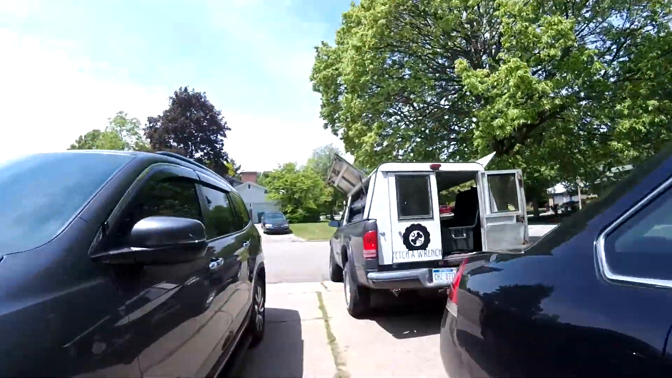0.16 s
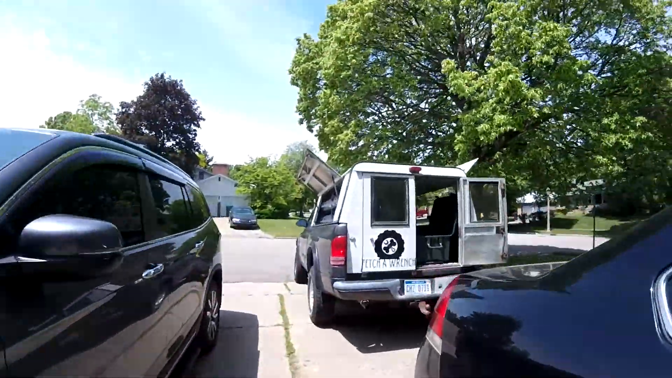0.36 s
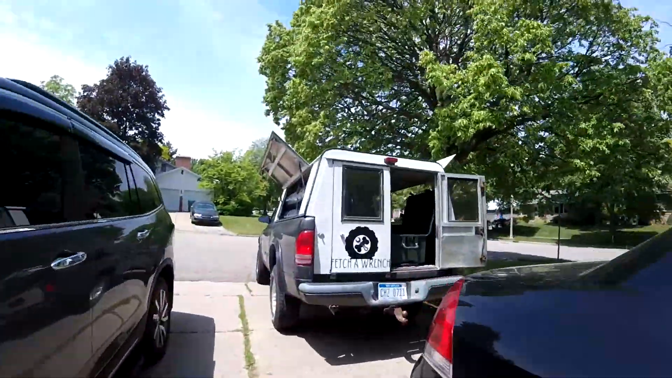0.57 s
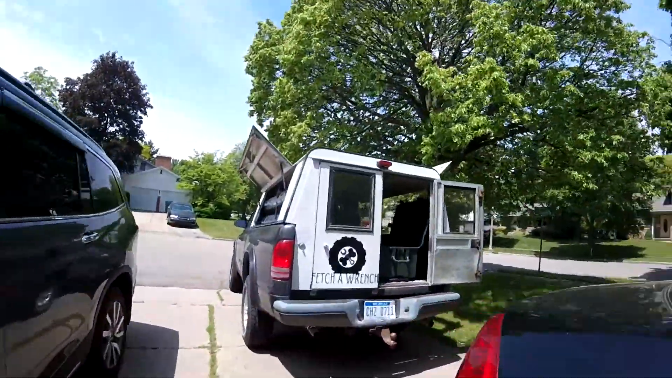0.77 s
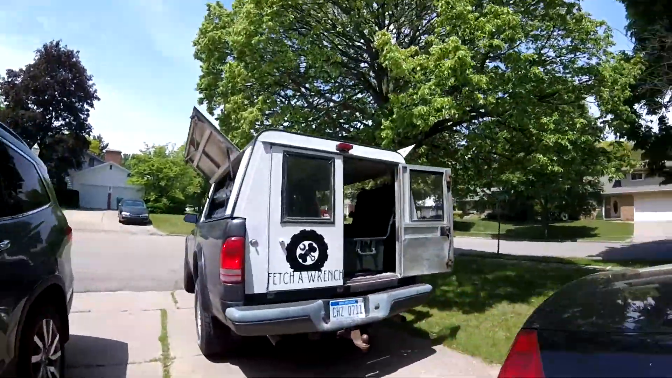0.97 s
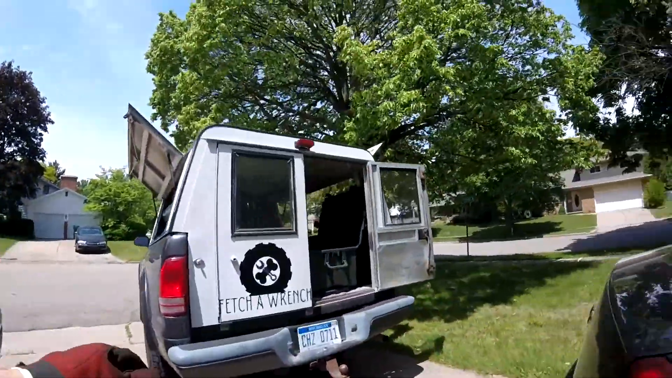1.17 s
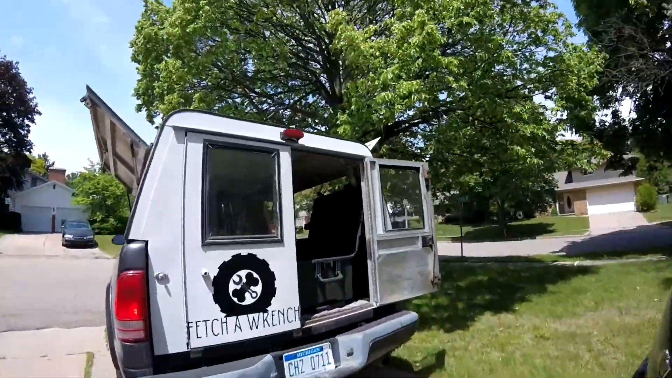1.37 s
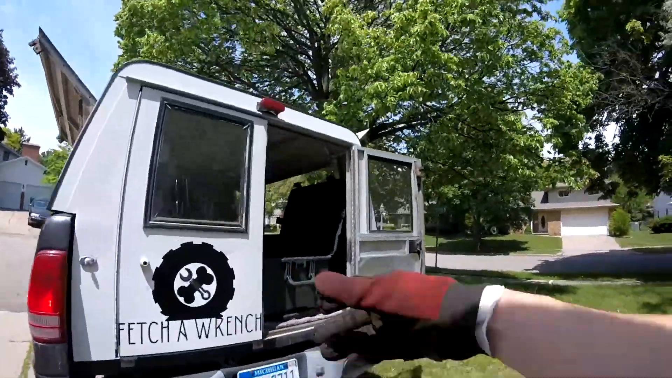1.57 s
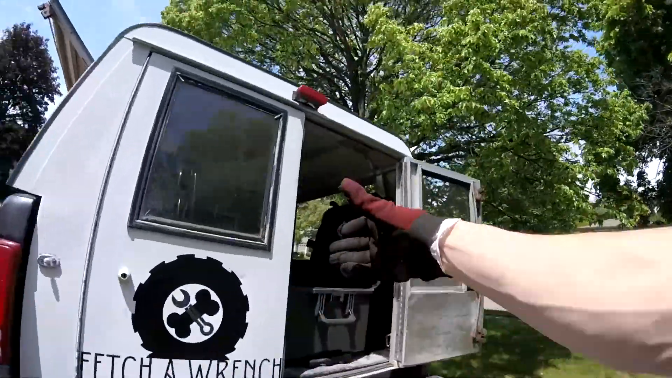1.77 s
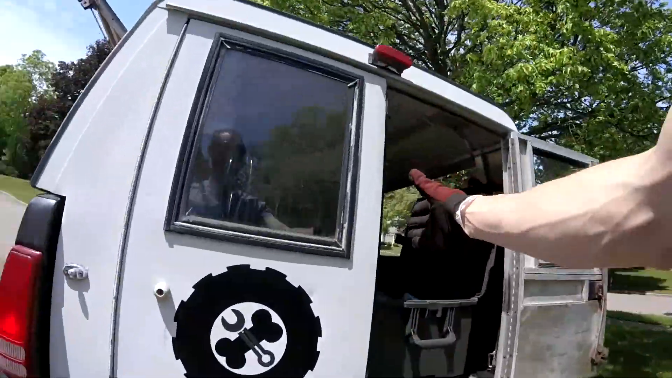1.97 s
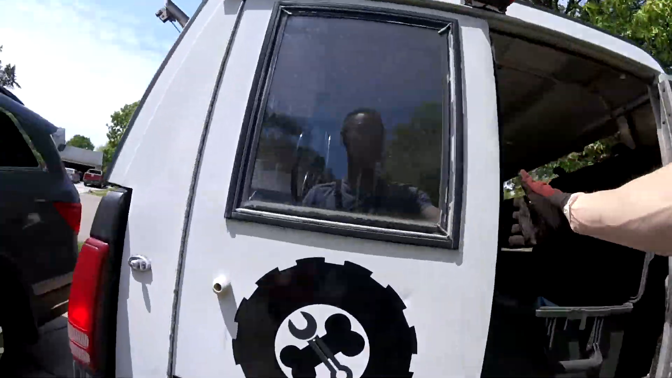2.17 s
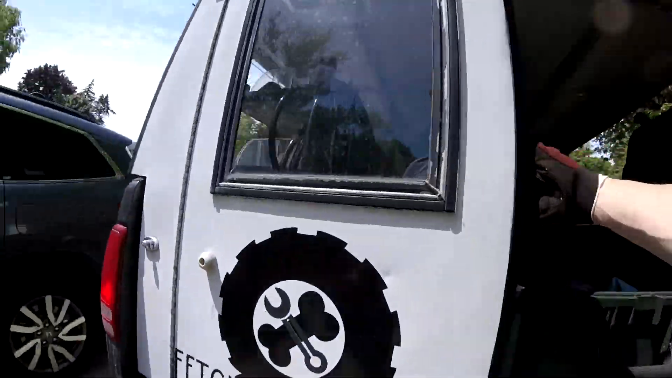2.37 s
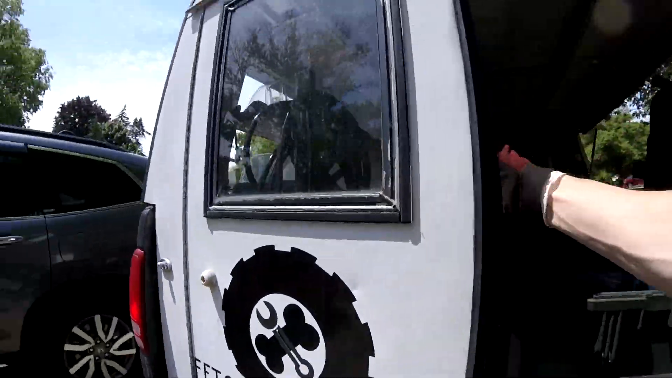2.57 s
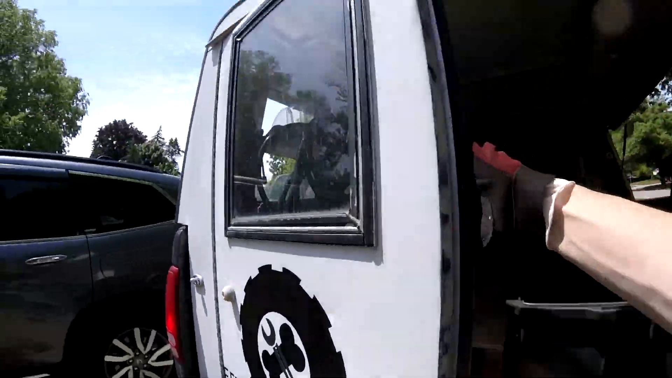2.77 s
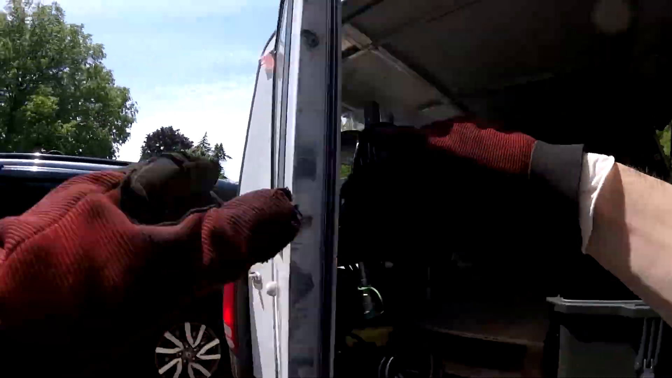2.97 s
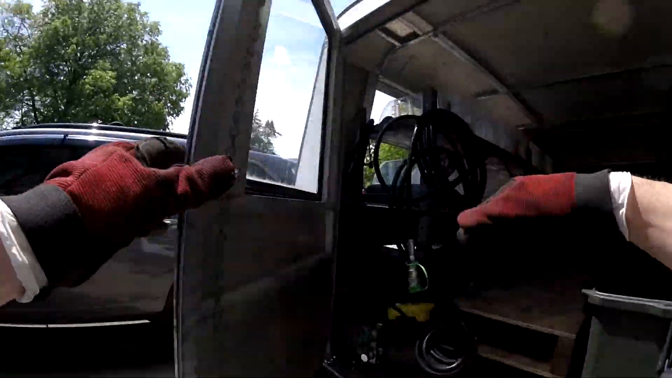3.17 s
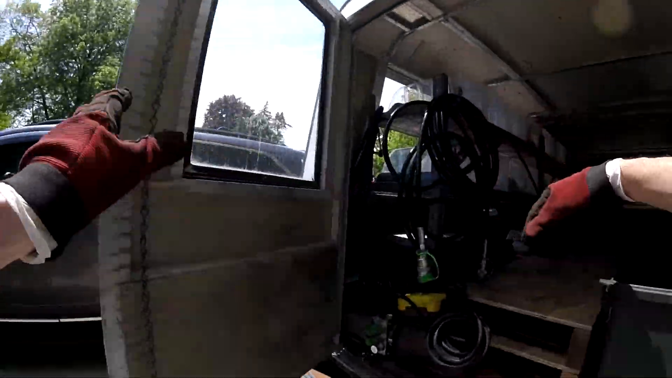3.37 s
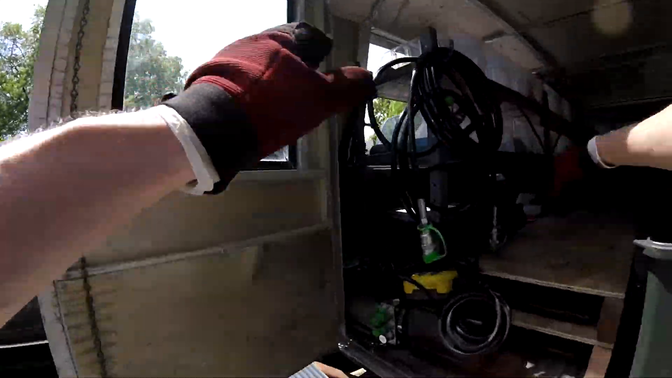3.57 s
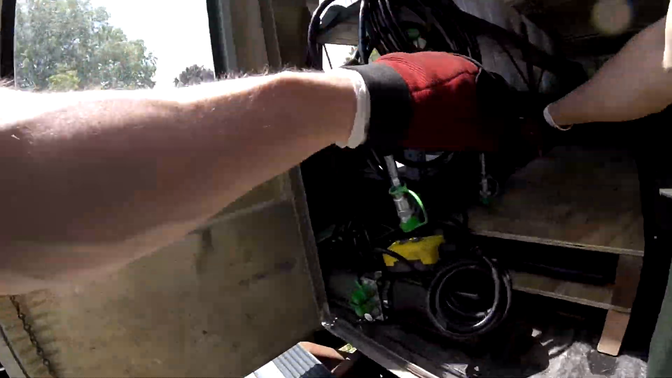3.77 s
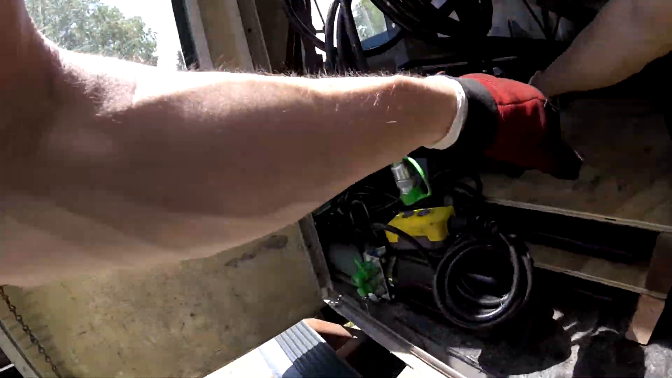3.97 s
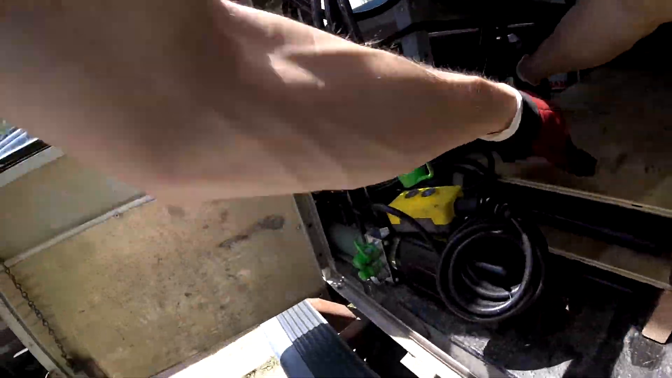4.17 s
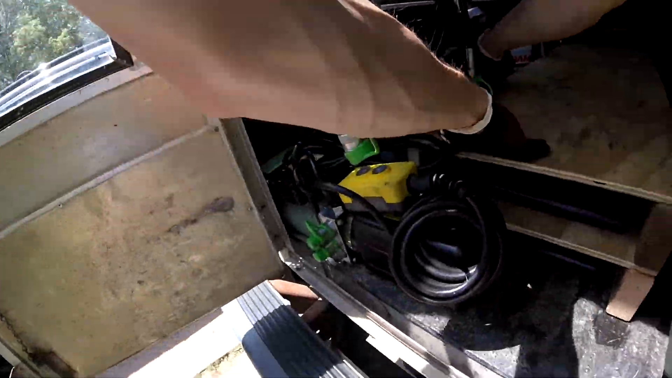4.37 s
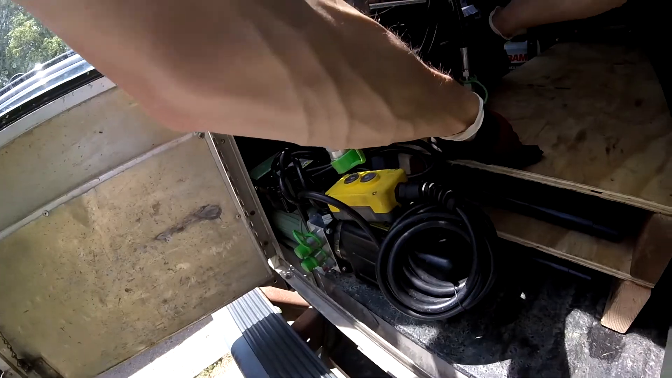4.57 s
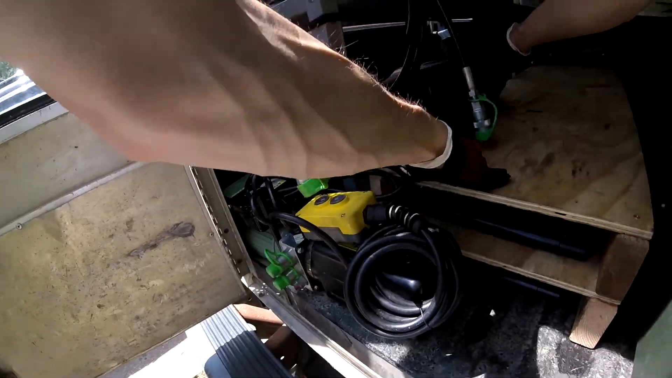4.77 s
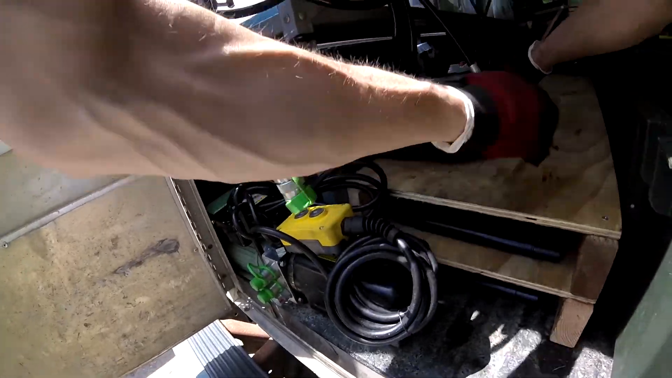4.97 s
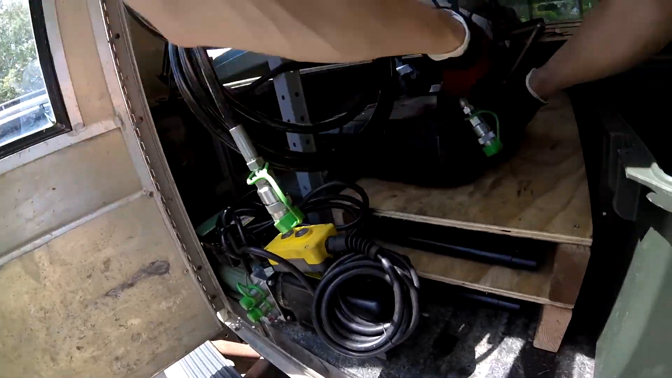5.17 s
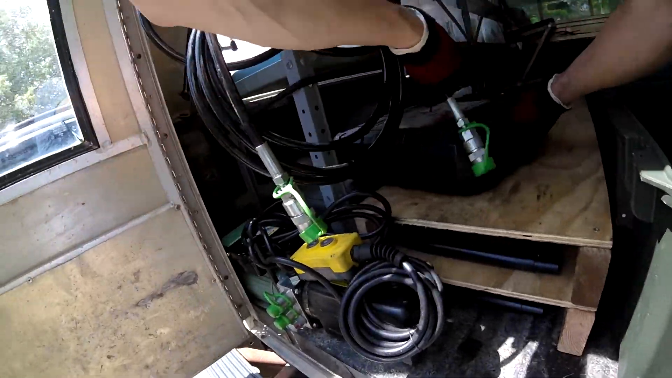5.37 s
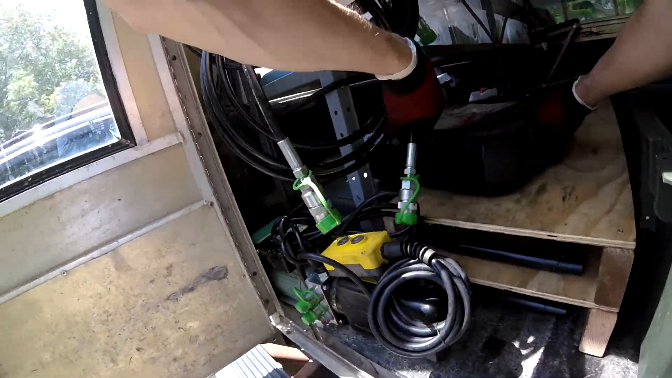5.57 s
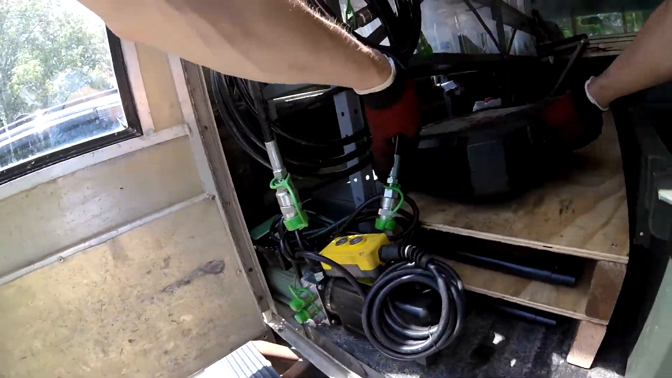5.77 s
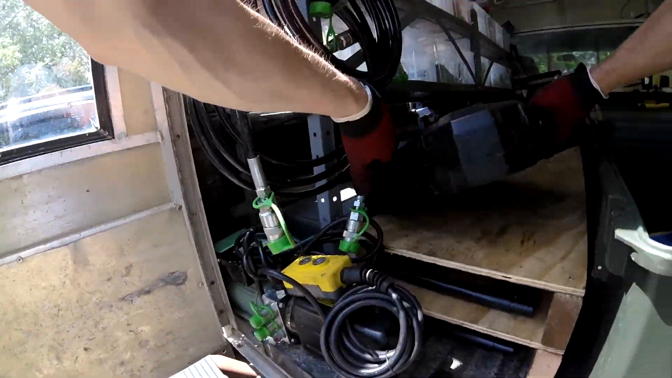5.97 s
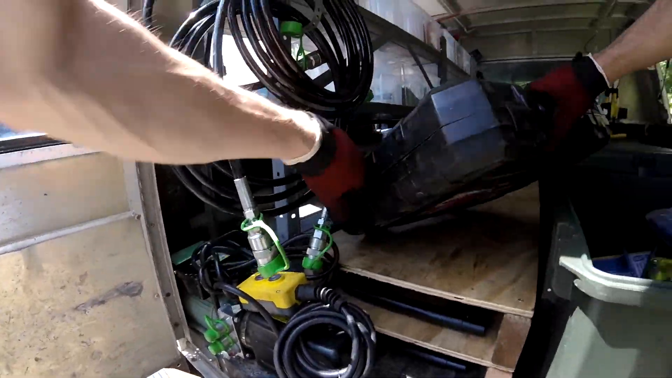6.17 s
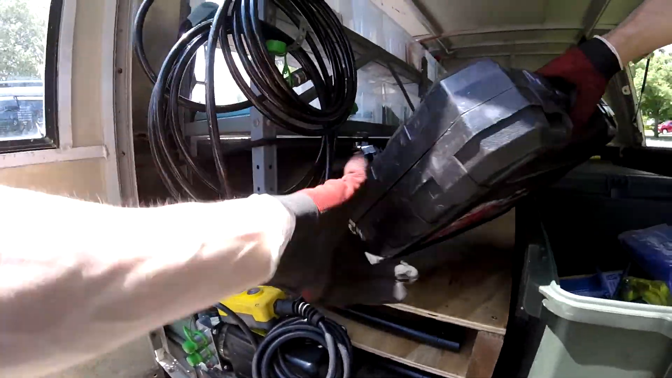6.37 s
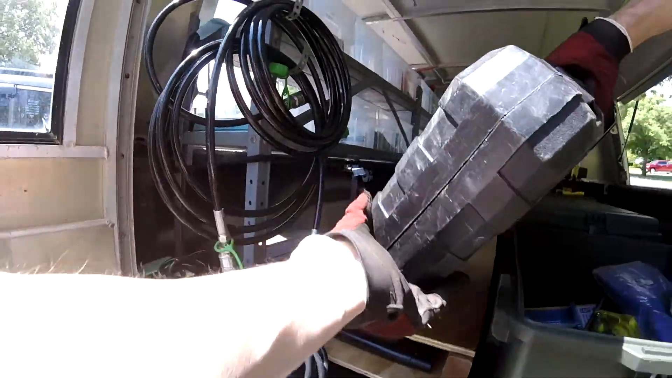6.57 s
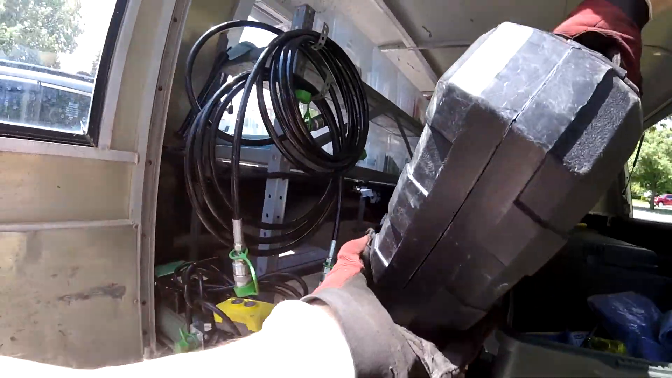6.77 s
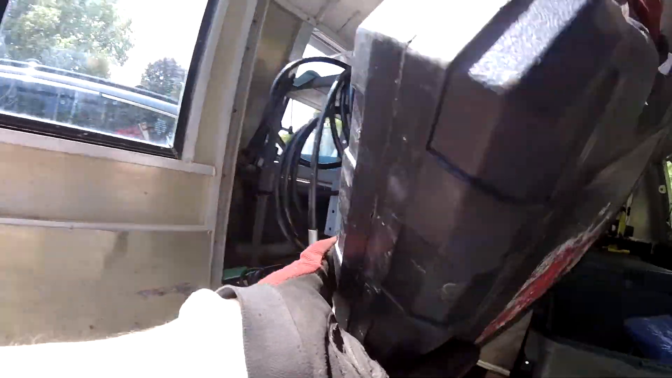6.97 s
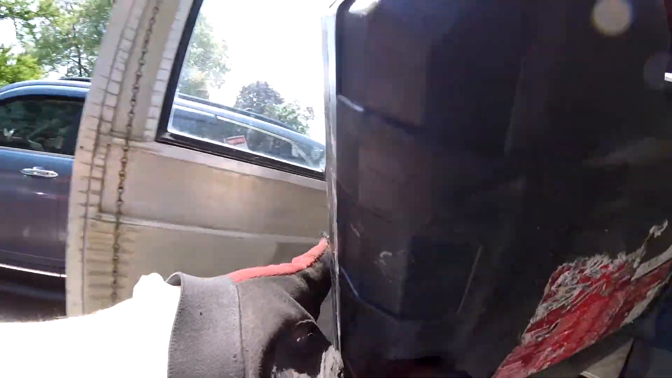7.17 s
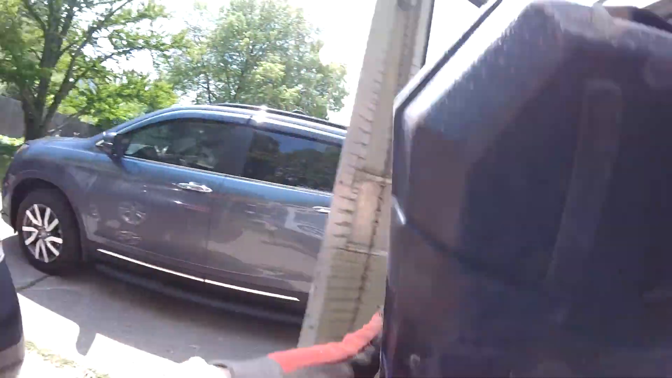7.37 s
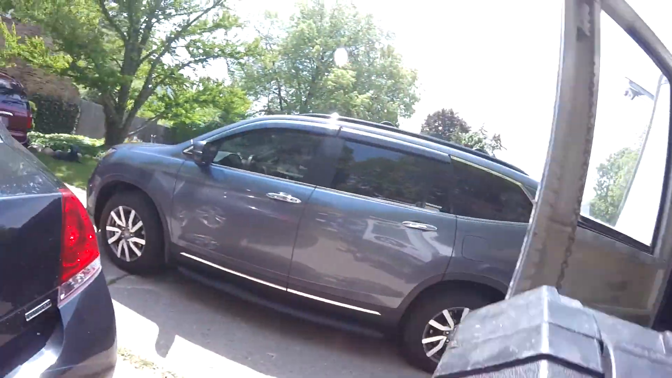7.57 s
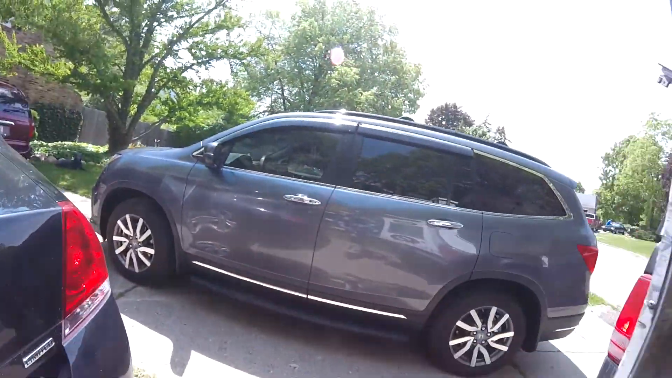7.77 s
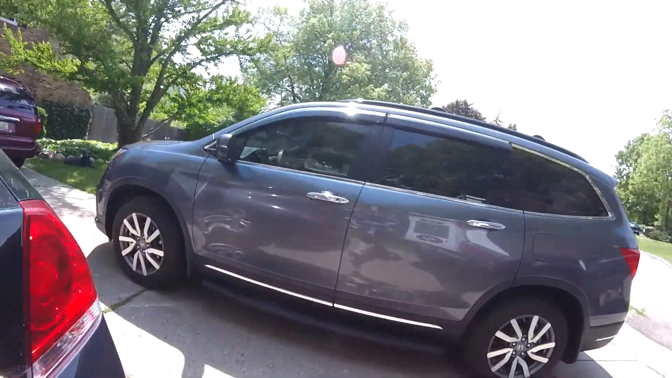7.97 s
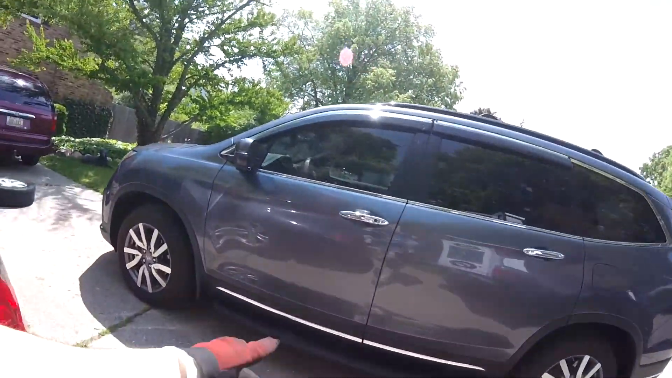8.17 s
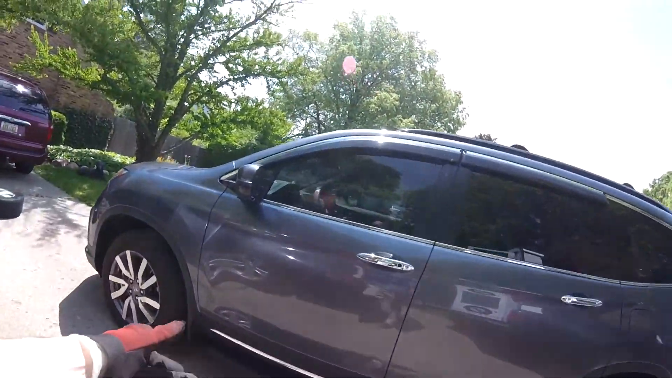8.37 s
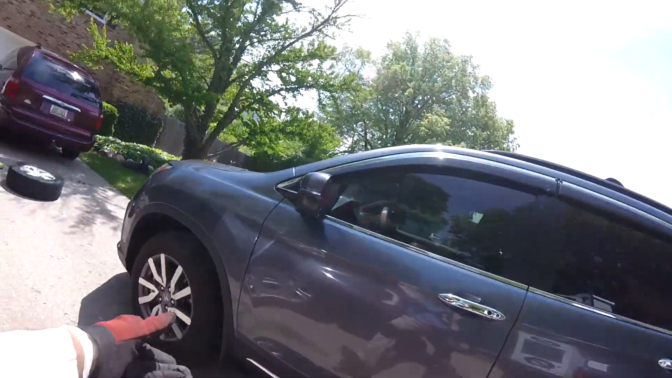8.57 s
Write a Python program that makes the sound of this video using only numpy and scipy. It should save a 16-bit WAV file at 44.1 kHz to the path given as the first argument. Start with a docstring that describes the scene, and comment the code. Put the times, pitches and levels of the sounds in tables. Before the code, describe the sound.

A quiet outdoor bed of distant street noise and light wind runs throughout, heard by a body-worn microphone. From 0 to 1.9 s, four soft footsteps fall on concrete with a little grit; a brief thin metallic rattle comes at 1.2 s. A low gust puffs at 2.35 s. Between 2.6 and 3.15 s a latch and loose metal clatter in sharp clusters, with a low shell boom. At 3.55 s the door hits its stop with a clank and short tinny ring. From 4.35 s a plastic case drags over plywood in jerky, hollow shudders, with heavy knocks around 4.7-5.0 s, dry clicks and tiny steel rings. A metal fitting rattles at 5.6 s and faintly at 5.95 s. Dense knocks and scraping follow from 6 to 6.6 s, another jolt at 7.2 s. Then the carried case bumps softly, with firmer knocks and a faint ring near 8.15 s.

```python
"""Light wind and distant street noise, both filtered noise, lie under the whole scene. Someone walks up a
driveway (filtered noise bursts) to a truck's camper shell, rattles the latch and swings the metal door open:
clusters of pitched bursts, then decaying sine modes at the door's stop. A plastic socket case is dragged over
a plywood shelf (random slips through resonances) while its load knocks and clicks and now and then a steel
socket rings as a decaying sine; at last the case is lifted out and carried, knocking more softly."""
import sys
import numpy as np
from scipy import signal
from scipy.fft import rfft, irfft, next_fast_len
from scipy.io import wavfile
from scipy.ndimage import map_coordinates

SR = 44100
rng = np.random.default_rng(int(sys.argv[2]) if len(sys.argv) > 2 else 0)


def wav_record(signal):
    """Record a signal, one row per channel, as 16-bit PCM in the file named by sys.argv[1]."""
    frames = np.transpose(np.atleast_2d(signal))
    bounded = np.clip(frames, -1, 1)
    # unit amplitude maps onto the largest positive 16-bit level
    quanta = np.round(bounded * 32767).astype(np.int16)
    wavfile.write(sys.argv[1], SR, quanta)


N = 379701
TIME = np.arange(N) / SR
AGE = TIME[:SR // 2]  # time axis of one struck sound, s
AT_SHELL_S, GRIPPED_S = 2, 7.05  # microphone close to the shell; case in the hands


def amp(db):
    """Decibels to gain."""
    return 10 ** (np.asarray(db) / 20)


def unit(x):
    """Scale to rms 1."""
    return x / np.sqrt(np.mean(x ** 2) + 1e-20)


def onset_unit(sound):
    """Scale to rms 1 over the first 10 ms."""
    return sound / np.std(sound[:SR // 100])


def fade(t60):
    """Exponential decay, -60 dB after t60 seconds."""
    return amp(-60 * AGE / t60)


def wobble(rate):
    """Smooth random curve, rate knots a second."""
    knots = rng.standard_normal(int(N * rate / SR) + 4)
    return map_coordinates(knots, [TIME * rate])


def swells(rows):
    """Gain curve of bell-shaped swells: centre in s, peak in dB, 1/e half-length in s."""
    return sum(amp(db) * np.exp(-((TIME - s) / length) ** 2) for s, db, length in rows)


def add(track, s, sound):
    """Mix a sound into the track at s seconds."""
    part = track[max(round(s * SR), 0):][:len(sound)]
    part += sound[:len(part)]


def colour(x, points, peak_hz=700, peak_db=0, width_hz=70):
    """Causal minimum-phase filter: gain through (Hz, dB) points plus one resonance."""
    m = 2 * next_fast_len(len(x) // 2 + 4096)
    f = np.fft.rfftfreq(m, 1 / SR)
    hz, db = np.transpose(points)
    gain_db = np.interp(np.log(f + 1), np.log(hz), db)
    gain_db = gain_db + peak_db / (1 + ((f - peak_hz) / width_hz) ** 2)
    # folding the cepstrum gives minimum phase
    cepstrum = irfft(np.log(amp(gain_db)), m)
    cepstrum[1:m // 2] *= 2
    cepstrum[m // 2 + 1:] = 0
    return irfft(rfft(x, m) * np.exp(rfft(cepstrum)), m)[:len(x)]


def rush(points):
    """Coloured noise of rms 1."""
    return unit(colour(rng.standard_normal(N), points))


def blow(points, t60, tail_db, tail_t60, snap, **tone):
    """One contact: a sharp crack, a fast noise chatter of dense modes, a weaker tail; onset rms 1."""
    envelope = fade(t60) + amp(tail_db) * fade(tail_t60) + snap / 5 * fade(.008)
    force = rng.standard_normal(len(AGE)) * envelope
    force[0] += snap
    return onset_unit(colour(force, points, **tone))


def ring(modes, blur_hz=0):
    """Free sine modes at random strengths and phases; phase drift widens each by blur_hz."""
    chance = rng.standard_normal((len(modes), 2))
    steps = rng.standard_normal((len(modes), len(AGE)))
    drift = np.cumsum(steps, axis=1) * np.sqrt(2 * np.pi * abs(blur_hz) / SR)
    tones = 0
    for (hz, db, t60), (extra_db, turn), phase in zip(modes, chance, drift):
        tone = np.sin(2 * np.pi * hz * AGE + np.pi * turn + phase)
        tones = tones + amp(db + extra_db) * fade(t60) * tone
    return tones * (1 - fade(0.0059))  # soft onset


def slips(rate):
    """Tiny catches and releases at random moments, rate a second, of very uneven size."""
    happens = rng.random(N) < rate / SR
    size = amp(4 * np.clip(rng.standard_normal(N), -2, 2))
    return happens * size * rng.choice([-1, 1], N)


def resonances(rows):
    """Response of broad resonances (Hz, width Hz, dB), alternating in sign, to one tap."""
    response = 0
    for k, (hz, width, db) in enumerate(rows):
        decay = width * np.exp(-np.pi * width * AGE)
        response = response + amp(db) * decay * np.cos(2 * np.pi * hz * AGE) * (-1) ** k
    return response


# Street and wind spectra. Each row: frequency in Hz, relative level in dB per Hz.
STREET = [(50, -1.5), (110, 5.5), (450, -1), (900, 4), (1250, -9.5), (1800, -14), (3700, -17),
          (4600, -22.5), (6400, -23), (7800, -30), (10000, -32), (14000, -46.5)]
BUFFET = [(15, -3), (30, -3), (55, -4.5), (110, -12), (200, -25), (500, -76)]
# Gusts. Each row: centre in seconds, level in dB, 1/e half-length in seconds.
GUSTS = [(0.12, -42, 0.083), (0.7, -40, 0.037), (2.35, -26.5, 0.074), (6.25, -39.5, 0.42),
         (6.68, -33, 0.33)]
STREET_DB, BREEZE_DB = -48.5, -42


def outdoors():
    """Distant street, and air buffeting the microphone: steady breeze plus gusts, both fluttering."""
    street = amp(STREET_DB + 0.11 * wobble(15.0)) * rush(STREET)
    flutter = amp(2.2 * wobble(8.2))
    return street + flutter * (amp(BREEZE_DB) + swells(GUSTS)) * rush(BUFFET)


# Shoes on concrete. Each row: sole contact in seconds, thud in dB, grit in dB.
STEPS = [(0.19, -39, -68), (0.753, -35, -42.5), (1.277, -37, -52.5), (1.844, -37.5, -70)]
# Grit cracking underfoot. Each row: start in seconds, level in dB, pitch in Hz.
CRACKLES = [(0.254, -51, 3770), (0.435, -46, 990)]
# Sole and grit spectra, also used for cloth. Each row: frequency in Hz, relative level in dB.
SHOE = [(40, -19.5), (100, 4), (300, 2), (550, -5), (850, 6), (1300, -16), (2500, -46.5)]
GRIT = [(900, 6.5), (1800, -1.5), (3700, 3), (4700, -8), (6500, -4), (8000, -23.5), (15000, -52)]
HEEL_LEAD_S, HEEL_DB = 0.096, -6  # heel re sole


def footsteps():
    """Heel, then sole: a soft shoe lands and crushes a little grit."""
    out = np.zeros(N)
    for s, thud_db, grit_db in STEPS:
        for at, db in [(s - HEEL_LEAD_S, HEEL_DB), (s, 0)]:
            thud = blow(SHOE, t60=.2, tail_db=-12, tail_t60=.45, snap=2)
            grit = blow(GRIT, t60=0.17, tail_db=-14, tail_t60=0.48, snap=8.7)
            add(out, at, amp(thud_db + db) * thud)
            add(out, at, amp(grit_db + 2 * db) * grit)  # grit falls twice as far in dB
    for s, db, hz in CRACKLES:
        crackle = blow(GRIT, t60=.04, tail_db=-20, tail_t60=.2, snap=2,
                       peak_hz=hz, peak_db=14, width_hz=250)
        add(out, s, amp(db) * crackle)
    return out


# Gloves and sleeves brushing. Each row: centre in seconds, thread level in dB, 1/e half-length in seconds.
RUSTLES = [(0.2, -55.5, 0.27), (1.8, -53, 0.084), (2.422, -50, 0.084), (2.451, -49, 0.0043),
           (4.314, -53.5, 0.039), (7.063, -43, 0.019), (7.237, -54, 0.029), (7.45, -55, 0.1),
           (7.972, -51, 0.025), (8.35, -55.5, 0.81)]


def rustles():
    """Cloth brushes by in short swells: a crackle of threads and a soft, stronger rub."""
    threads = unit(colour(slips(rate=2500), GRIT))
    rub = unit(colour(slips(rate=900), SHOE))
    return swells(RUSTLES) * amp(2.55 * wobble(40)) * (threads + amp(10.5) * rub)


# Panel, latch and sizzle spectra. Each row: frequency in Hz, relative level in dB.
PANEL = [(60, -27.5), (270, -20), (460, -3), (560, -3), (730, 1), (920, 0.5), (1200, -15), (1700, -21),
         (3000, -65.5)]
LATCH = [(250, -3.5), (900, 1.5), (1700, -5), (2500, 4), (3400, 4), (4200, -3), (5500, -60.5)]
SIZZLE = [(3000, -44), (4600, 1), (5800, 4.5), (6800, -3.5), (8000, -11), (10000, -13), (13000, -26),
          (15500, -26)]
NEAR_ECHO_DB, FAR_ECHO_DB = -9, -37  # shell echo in the panel's tail


def contact(s, panel_db, pitch_hz, clack_db, sizzle_db):
    """Metal meets metal: a small part clacks at a pitch of its own and shakes the thin panel."""
    echo_db = NEAR_ECHO_DB if s > AT_SHELL_S else FAR_ECHO_DB
    panel = blow(PANEL, t60=0.091, tail_db=echo_db, tail_t60=0.4, snap=10.7,
                 peak_hz=pitch_hz, peak_db=9.5, width_hz=68)
    clack = blow(LATCH, t60=0.04, tail_db=-14, tail_t60=0.16, snap=5,
                 peak_hz=rng.uniform(1900, 3800), peak_db=6, width_hz=150)
    sizzle = blow(SIZZLE, t60=0.062, tail_db=-10.5, tail_t60=0.13, snap=4.03)
    return amp(panel_db) * panel + amp(clack_db) * clack + amp(sizzle_db) * sizzle


# Latch, door and loose gear.
# Each row: start in seconds, panel in dB, panel pitch in Hz, clack in dB, sizzle in dB.
CLACKS = [(1.157, -26.5, 1020, -45.5, -51), (1.169, -39, 920, -38.5, -51), (1.178, -20.5, 628, -40, -41),
          (1.189, -40, 710, -34, -46), (2.569, -24.5, 815, -35, -45), (2.576, -22.5, 867, -26.5, -41.5),
          (2.598, -22, 800, -32, -49.5), (2.607, -29, 710, -22.5, -33.5), (2.616, -19, 850, -24.5, -42),
          (2.635, -20, 780, -11, -31.5), (2.71, -23, 817, -43, -54.5), (2.79, -27, 930, -31.5, -53),
          (2.852, -23, 690, -30.5, -49), (2.869, -14.5, 740, -33, -57), (2.877, -24, 454, -34, -44.5),
          (2.891, -19.5, 720, -26.5, -39.5), (2.985, -45, 770, -41.5, -62), (3.119, -28, 940, -31, -44),
          (3.123, -36, 790, -35, -28.5), (3.132, -26.5, 706, -23, -23.5), (3.142, -24, 800, -19.5, -25.5),
          (3.538, -16.5, 880, -33, -38.5), (3.548, -16, 513, -24, -30.5), (3.555, -15, 944, -22.5, -26),
          (3.571, -18.5, 910, -26, -32.5), (3.79, -34.5, 670, -62, -68), (5.61, -23, 620, -30, -37.5),
          (5.619, -17.5, 880, -32, -40), (5.934, -36, 870, -30, -39.5), (5.944, -22, 890, -28.5, -36)]
# Shell booms as the latch lets go and the door stops. Each row: start in seconds, level in dB.
BOOMS = [(2.645, -26), (2.695, -34.5), (2.742, -34.5), (3.553, -35)]
# Shell spectrum. Each row: frequency in Hz, relative level in dB.
SHELL = [(40, -9), (110, 8.5), (190, 10.5), (290, 9), (420, 2), (700, -49)]
# Door reaches its stop. Each row: start in seconds, level in dB.
DOOR_STOP = [(3.552, -19)]
# Door skin modes. Each row: frequency in Hz, level in dB, t60 in seconds.
DOOR_MODES = [(447, -8, 0.078), (540, -17.5, 0.82), (704, -5, 0.38), (830, -3, 0.089), (1100, 5.5, 0.18),
              (1298, -10.5, 0.4), (1396, -10, 0.2), (1496, -7.5, 0.21), (1740, -9.5, 0.23),
              (2100, -5, 0.16), (2560, -3, .15)]
SKIN_DB = -22.5  # dense upper modes, a short wash


def door():
    """Latch and loose parts hit in quick clusters; at the stop the door skin rings in its modes."""
    out = np.zeros(N)
    for s, *sound in CLACKS:
        add(out, s, contact(s, *sound))
    for s, db in BOOMS:
        add(out, s, amp(db) * blow(SHELL, t60=0.22, tail_db=-12.0, tail_t60=1.0, snap=0.89))
    for s, db in DOOR_STOP:
        add(out, s, amp(db) * ring(DOOR_MODES, blur_hz=9))
        wash = blow(LATCH, t60=0.15, tail_db=-24, tail_t60=0.19, snap=0)
        add(out, s, amp(SKIN_DB) * wash)
    return out


# Pulls over the shelf, then slides of the load as the case tips. Each row: start in seconds,
# length in seconds, shudder at start in dB, shudder at end in dB, scrape in dB.
PULLS = [(4.352, 0.47, -30.5, -29.5, -49.5), (4.657, 0.4, -19.5, -16, -39.5),
         (5.112, 0.11, -28, -28.5, -48.5), (5.26, .05, -23.5, -20, -44.5), (5.32, 0.028, -14, -16.5, -40.5),
         (5.666, 0.16, -30, -25, -43), (5.802, 0.23, -20, -14.5, -40), (6.101, 0.12, -16, -19.5, -37.5),
         (6.25, .06, -31, -33, -40), (6.31, 0.059, -20, -18, -37), (6.413, 0.069, -20.5, -20, -42),
         (6.514, 0.34, -28.5, -34.5, -49), (6.794, 0.08, -21, -27, -55),
         (7.126, 0.011, -20.5, -19.5, -44.5), (7.187, 0.031, -12.5, -19, -40),
         (7.225, 0.015, -26, -29, -38)]
PULL_ATTACK_DB_PER_S, PULL_RELEASE_DB_PER_S = 601, 279  # of the shudder
SCRAPE_FADE = 0.81  # scrape slopes re shudder slopes in pulls
SHIFT_DB, SHIFT_SCRAPE_DB = -44, -67.5  # load shifting softly in the hands


def sliding_db():
    """Shudder and scrape: each pull sets in, holds, dies away; in the hands a soft shifting stays."""
    early = PULL_ATTACK_DB_PER_S * np.maximum(GRIPPED_S - TIME, 0)
    shudder, scrape = [SHIFT_DB - early], [SHIFT_SCRAPE_DB - early]
    for s, length, start_db, end_db, scrape_db in PULLS:
        attack = PULL_ATTACK_DB_PER_S * np.maximum(s - TIME, 0)
        release = PULL_RELEASE_DB_PER_S * np.maximum(TIME - s - length, 0)
        fall = attack + release
        shudder.append(np.interp(TIME, [s, s + length], [start_db, end_db]) - fall)
        scrape.append(scrape_db - SCRAPE_FADE * fall)
    return np.max(shudder, axis=0), np.max(scrape, axis=0)


# Pitches of the rasping case edge. Each entry: frequency in Hz.
SCUFF_HZ = [2680, 3880, 5480]
# Plastic spectrum, also used for clicks. Each row: frequency in Hz, relative level in dB.
PLASTIC = [(900, -0.5), (1750, -4), (2300, 4), (2900, -0.5), (3700, -4), (4600, -12), (6000, -10.5),
           (7800, -24.5), (9700, -27.5), (12300, -35.5), (15000, -52.5)]


def scuffs():
    """Gritty rub whose broad resonances swell and sink independently; rms 1."""
    bands = []
    for hz in SCUFF_HZ:
        swell = amp(3.8 * wobble(45))
        bands.append(swell * colour(slips(rate=800), PLASTIC, peak_hz=hz, peak_db=7, width_hz=300))
    return unit(sum(bands))


# Case hollows on the shelf. Each row: frequency in Hz, width in Hz, level in dB.
HOLLOW = [(182.5, 30, 1), (348, 226, 0), (903, 103, -3.5)]
# Case spectrum, also used for knocks. Each row: frequency in Hz, relative level in dB.
CASE = [(40, -26.5), (100, -6), (170, 0), (260, -5), (400, -2.5), (600, -4.5), (900, -1.5), (1150, -15),
        (1450, -24.5), (2000, -43), (4000, -75)]
# Edge hissing over wood as the case tilts.
# Each row: centre in seconds, level in dB, 1/e half-length in seconds.
HISSES = [(6.19, -46.5, 0.039), (6.33, -49, 0.027), (6.5, -53, 0.11)]
# Edge spectrum. Each row: frequency in Hz, relative level in dB.
EDGE = [(3000, -14), (5800, 11), (7800, -6), (10000, -2.5), (12500, -13), (14500, -39)]


def drag():
    """Case judders over plywood: coarse slips boom in its hollows, fine ones merge into a scuffing rub."""
    shudder, scrape = amp(sliding_db())
    boom = signal.fftconvolve(slips(rate=450), resonances(HOLLOW))[:N]
    boom = unit(colour(boom, CASE))
    shake = unit(colour(slips(rate=380), CASE))
    hiss = swells(HISSES) * unit(colour(slips(rate=4900), EDGE))
    grip = amp(1.8 * wobble(45))  # edge catches and lets go
    judder = grip * shudder * (amp(-5.5) * boom + amp(-4.5) * shake)
    return judder + np.sqrt(grip) * scrape * scuffs() + hiss


# Carried case, with less bass, and clicks heard through it.
# Each row: frequency in Hz, relative level in dB.
CARRIED = [(60, -26.5), (170, -0.5), (300, -3), (480, -2.5), (640, -3.5), (880, 0), (1100, -17.5),
           (1500, -24.5), (2500, -78)]
MUFFLED = [(900, -3), (1750, -3.5), (2800, -5.5), (3700, -1.5), (4600, -17), (6000, -11.5), (7800, -27),
           (10000, -33.5), (15000, -63)]


def knock(s, thump_db, pitch_hz, click_db):
    """Heavy load thumps a wall of the hollow case: chattering at first, short and dry in the hands."""
    if s < GRIPPED_S:
        thump = blow(CASE, t60=0.11, tail_db=-7.5, tail_t60=0.25, snap=6.4,
                     peak_hz=pitch_hz, peak_db=8.5)
        click = blow(PLASTIC, t60=0.07, tail_db=-15, tail_t60=0.3, snap=2,
                     peak_hz=rng.uniform(2200, 3400), peak_db=5, width_hz=160)
    else:
        thump = blow(CARRIED, t60=0.051, tail_db=-13, tail_t60=0.26, snap=0.8,
                     peak_hz=pitch_hz, peak_db=10)
        click = blow(MUFFLED, t60=0.03, tail_db=-22.5, tail_t60=0.29, snap=1.5,
                     peak_hz=rng.uniform(2600, 3500), peak_db=10, width_hz=130)
    return amp(thump_db) * thump + amp(click_db) * click


# Load knocking in the case. Each row: start in seconds, thump in dB, wall pitch in Hz, click in dB.
KNOCKS = [(4.663, -16.5, 584, -39), (4.704, -7.5, 763, -44), (4.74, -14, 710, -38),
          (4.866, -16.5, 720, -44), (4.917, -9.5, 1027, -26.5), (4.955, -8.5, 337, -29.5),
          (5.0, -7.5, 758, -26), (5.128, -19.5, 187, -52), (5.262, -25, 170, -41), (5.495, -23, 260, -50),
          (5.975, -12.5, 895, -28.5), (6.012, -9.5, 390, -44), (6.046, -11, 178, -35),
          (6.104, -10, 377, -51.5), (6.15, -21, 684, -50), (6.175, -14, 880, -37),
          (6.209, -10.5, 472, -33.5), (6.235, -16.5, 503, -46), (6.32, -11, 403, -40),
          (6.35, -11.5, 604, -41), (6.593, -8, 407, -32), (6.624, -19, 505, -39), (6.783, -24, 181, -49),
          (6.968, -31, 468, -76), (7.138, -21, 920, -40), (7.186, -11, 440, -40), (7.193, -12, 500, -41),
          (7.203, -15.5, 844, -41), (7.262, -11.5, 343, -38), (7.3, -20.5, 390, -47),
          (7.722, -20, 468, -56), (7.744, -22, 232, -51), (7.855, -26, 840, -51), (7.926, -24.5, 333, -63),
          (8.108, -24, 350, -40.5), (8.132, -8.5, 593, -29), (8.164, -26, 560, -54),
          (8.188, -11.5, 637, -35.5), (8.217, -17.5, 610, -44), (8.424, -29, 226, -72),
          (8.501, -30, 585, -70), (8.556, -30, 229, -70)]
REBOUND_S, REBOUND_DB = .02, -9.5  # mean delay and level re knock


def knocks():
    """Load hits the case wall; until the case is in the hands a weaker rebound follows each knock."""
    out = np.zeros(N)
    for s, *sound in KNOCKS:
        add(out, s, knock(s, *sound))
        if s < GRIPPED_S:
            rebound_s = s + REBOUND_S * rng.uniform(.7, 1.3)
            add(out, rebound_s, amp(REBOUND_DB) * knock(s, *sound))
    return out


# Packed sockets clicking together. Each row: start in seconds, level in dB.
TICKS = [(4.7, -26.5), (4.737, -30), (4.92, -29), (4.995, -32), (5.978, -38.5), (6.012, -31),
         (6.044, -32.5), (6.321, -43), (6.404, -35), (6.595, -34), (7.19, -32)]
# Click spectrum. Each row: frequency in Hz, relative level in dB.
TICK = [(700, 0), (1300, 3.5), (1800, 0), (2500, 11.5), (3700, 4.5), (4600, -12.5), (5800, -2), (7500, -30),
        (15000, -43)]
# Case bumping a hanging metal fitting. Each row: start in seconds, level in dB.
BUMPS = [(5.61, -16.5), (5.935, -31)]
# Fitting resonances. Each row: frequency in Hz, width in Hz, level in dB.
FITTING = [(860, 90, 5), (2490, 254, -2), (3120, 170, -13.5), (4380, 250, -10), (5520, 420, -16.5),
           (6640, 230, -19.5)]


def ticks():
    """Hard, dry clicks of steel in the case; a bumped fitting rattles as noise through resonances."""
    out = np.zeros(N)
    for s, db in TICKS:
        add(out, s, amp(db) * blow(TICK, t60=0.067, tail_db=-12.5, tail_t60=0.14, snap=1.6))
    for s, db in BUMPS:
        chatter = rng.standard_normal(len(AGE)) * fade(0.12)
        rattle = signal.fftconvolve(chatter, resonances(FITTING))
        add(out, s, amp(db) * onset_unit(rattle))
    return out


# Socket rings until its neighbours stop it.
# Each row: start in seconds, level in dB, upper modes in dB re level, free ringing in seconds.
CHIMES = [(4.935, -40, -2, .05), (4.965, -44, -3, .02), (5.031, -46, -4, .022), (6.078, -45, -12, .04),
          (6.105, -47, 3, .02), (8.108, -53, -25, .29), (8.137, -47, -20, .1)]
# Lowest mode, then the upper modes that a hard hit wakes.
# Each row: frequency in Hz, level in dB, t60 in seconds.
SOCKET = [(6385, 0, .75)]
SOCKET_BRIGHT = [(9430, -0.5, 0.12), (12170, -13, 0.18)]
STOP_DB_PER_S = 550  # added damping once touched


def steel():
    """Steel socket jumps free and rings, brighter after a hard hit, until it is stopped."""
    out = np.zeros(N)
    for s, db, bright_db, free_s in CHIMES:
        stopped_db = STOP_DB_PER_S * np.maximum(AGE - free_s, 0)
        tone = ring(SOCKET) + amp(bright_db) * ring(SOCKET_BRIGHT, blur_hz=70)
        add(out, s, amp(db - stopped_db) * tone)
    return out


JOSTLE_PER_S, JOSTLE_DB, JOSTLE_SPREAD_DB = 7.6, -35, 3.5


def jostle():
    """In the hands, loose sockets bump the walls softly at uneven moments."""
    out = np.zeros(N)
    for s in np.arange(GRIPPED_S, N / SR, 1 / JOSTLE_PER_S):
        bump = blow(CARRIED, t60=0.11, tail_db=-10, tail_t60=0.35, snap=2.5,
                    peak_hz=rng.uniform(180, 800), peak_db=7)
        at = s + rng.random() / JOSTLE_PER_S
        add(out, at, amp(JOSTLE_DB + JOSTLE_SPREAD_DB * rng.standard_normal()) * bump)
    return out


def scene():
    """Everything at one body-worn microphone, one channel."""
    approach = outdoors() + footsteps() + rustles() + door()
    case = drag() + knocks() + ticks() + steel() + jostle()
    return (approach + case)[None]


TOP_HZ = 15800


def record(dry):
    """Microphone chain rounds off the highest peaks and passes nothing from TOP_HZ up."""
    held = dry / (1 + np.abs(dry) ** 6) ** (1 / 6)
    m = next_fast_len(N + SR // 2)
    passed = np.fft.rfftfreq(m, 1 / SR) < TOP_HZ
    return irfft(rfft(held, m) * passed, m)[..., :N]


dry = scene()
out = record(dry)
wav_record(out)
```